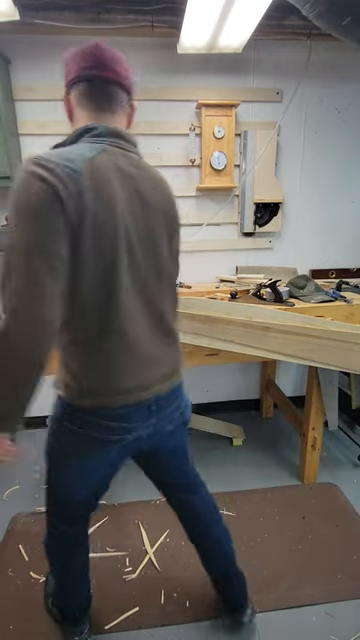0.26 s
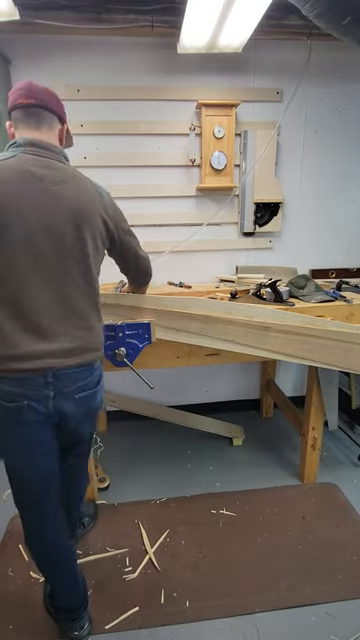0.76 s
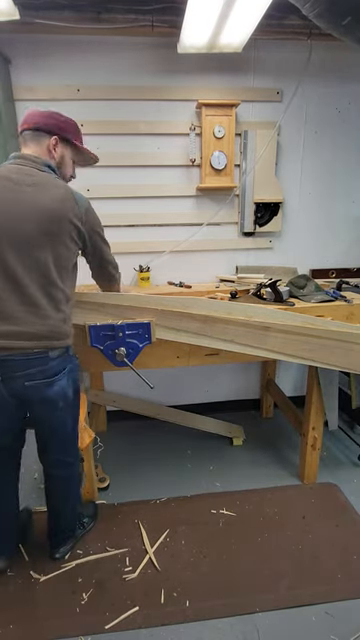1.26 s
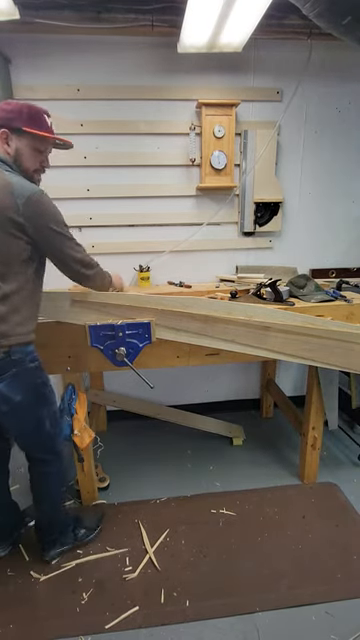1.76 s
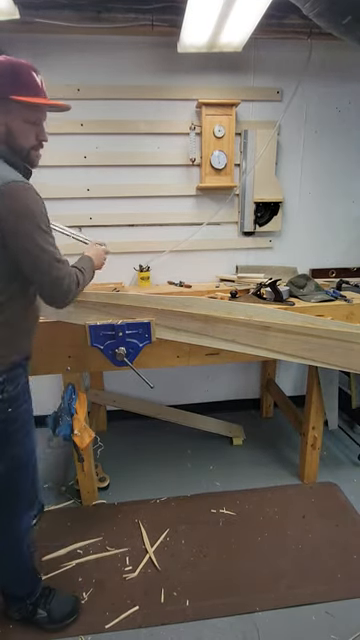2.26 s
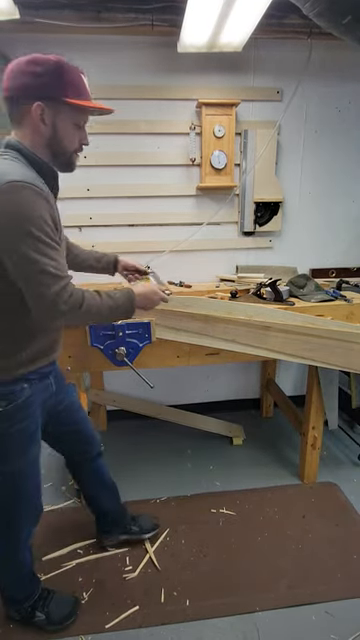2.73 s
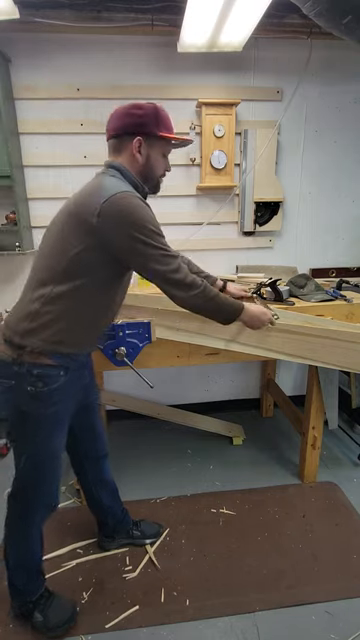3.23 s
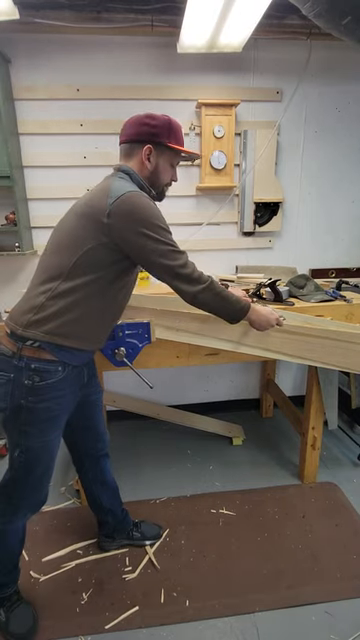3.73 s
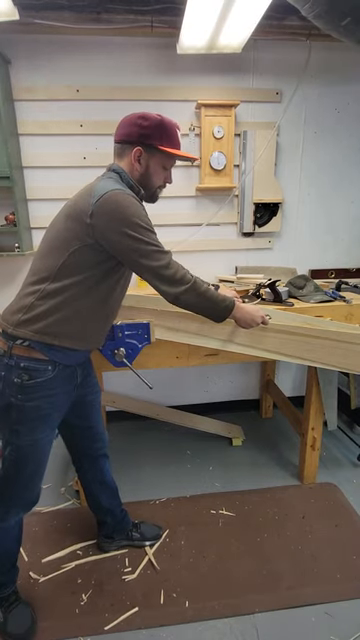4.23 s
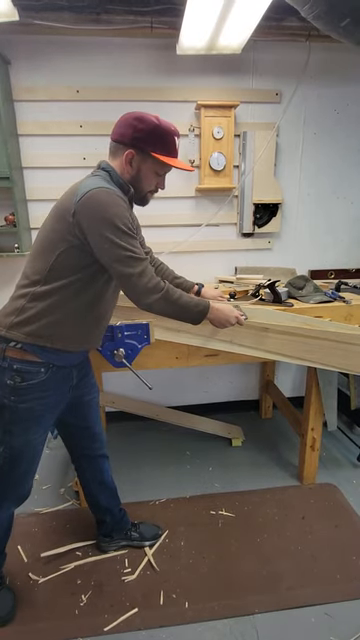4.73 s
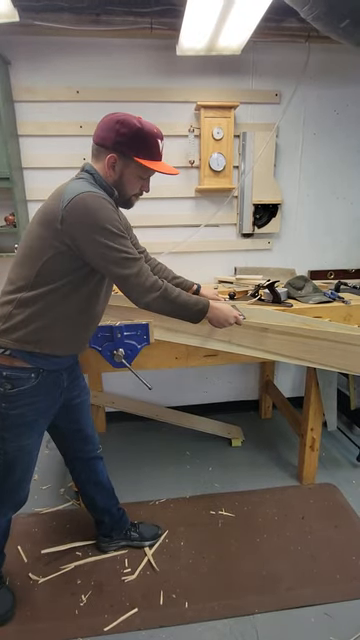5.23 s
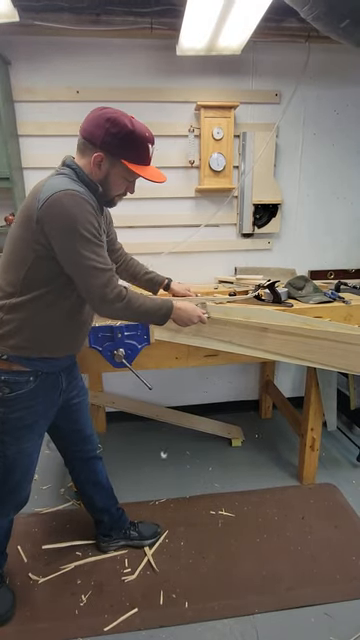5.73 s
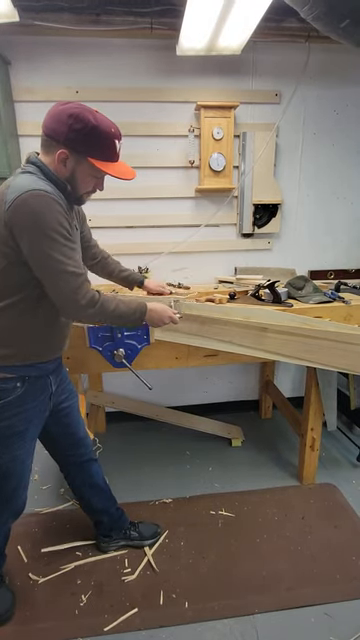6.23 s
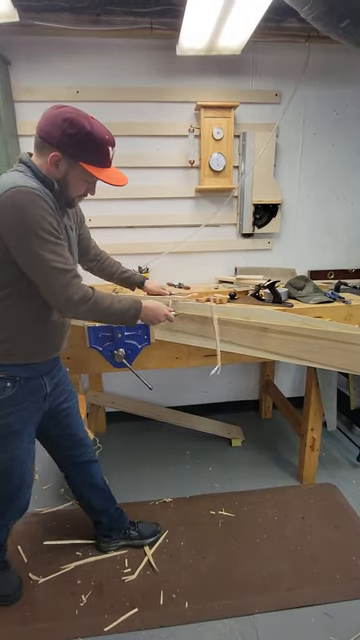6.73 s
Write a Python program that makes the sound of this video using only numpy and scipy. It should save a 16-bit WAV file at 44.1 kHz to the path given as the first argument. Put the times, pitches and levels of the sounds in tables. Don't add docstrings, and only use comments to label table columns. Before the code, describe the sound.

A fan hums while shoes shuffle and a tool clatters on a bench, then short rasping cuts tear wood fibres, growing louder and sharper.

```python
import sys
import numpy as np
from scipy import signal
from scipy.fft import rfft, irfft, next_fast_len
from scipy.io import wavfile
from scipy.ndimage import uniform_filter1d

SR = 44100
rng = np.random.default_rng(int(sys.argv[2]) if len(sys.argv) > 2 else 0)


def master_out(mix):
    frames = np.transpose(np.atleast_2d(mix))
    ceiling = np.clip(frames, -1, 1)
    pcm = np.round(ceiling * 32767).astype(np.int16)
    wavfile.write(sys.argv[1], SR, pcm)


def field_ratio(decibels):
    return 10 ** (np.asarray(decibels, dtype=float) / 20)


N = 307818
SIZE = next_fast_len(N + 32768)
HZ = np.fft.rfftfreq(SIZE, 1 / SR) + 1e-3

# (full bite t/s, level/dB, rise/s, hold/s, keenness/dB)
CUTS = [(3.768, -44.5, 0.11, 0.057, -1), (3.862, -39, 0.2, .06, 4), (3.914, -36.5, 0.03, 0.05, 4.5),
        (3.979, -35, 0.026, 0.018, 7), (4.28, -32, 0.032, 0.024, 6), (4.345, -41, .1, 0.0064, 10),
        (4.64, -32.5, 0.06, 0.012, 8), (4.665, -30.5, 0.066, 0.061, 4), (4.75, -28, 0.087, 0.021, 5),
        (4.772, -22.5, 0.038, 0.011, 1), (4.81, -24.5, 0.18, 0.0049, 1), (5.328, -20, 0.013, 0.051, 0),
        (5.39, -24, 0.13, 0.008, 0), (5.744, -22, 0.053, 0.078, 1), (5.826, -19, 0.051, 0.017, 2.5),
        (5.87, -24, 0.079, 0.032, 4), (6.228, -22.5, 0.028, .02, 6.5), (6.243, -18, 0.053, 0.0093, 3),
        (6.272, -18, 0.046, 0.015, 3), (6.36, -21.5, 0.2, 0.0083, 1), (6.66, -39.5, 0.025, .002, 14.5),
        (6.836, -27, 0.035, .02, 2.5), (6.886, -22, 0.14, 0.051, 1)]
# (t/s, level/dB, rise/s, hold/s, keenness/dB)
GLIDES = [(3.4, -59.5, 0.027, 0.068, 4), (3.454, -46, 0.034, 0.0089, -16), (3.5, -51.5, .03, 0.047, 1),
          (3.6, -52, 0.43, 0.0017, 8), (4.134, -53, 0.03, 0.0069, 5), (4.2, -64, .05, 0.026, 17),
          (4.454, -47.5, 0.026, 0.0047, 5.5), (4.568, -45, 0.028, 0.044, 8), (4.606, -39.5, .02, .02, 6.5),
          (4.95, -49.5, 0.11, 0.075, -3), (5.07, -55.5, 0.097, 0.014, 6.5), (5.15, -50.5, 0.035, .03, -1),
          (5.19, -45, 0.085, 0.012, 1), (5.234, -41, 0.12, 0.0044, -4), (5.3, -41.5, 0.089, .02, 2),
          (5.612, -42.5, 0.015, 0.031, -0.5), (5.654, -42.5, 0.09, 0.0074, -6),
          (6.03, -45, 0.21, 0.012, 1.5), (6.19, -35.5, 0.05, .02, 2.5), (6.462, -40.5, 0.12, 0.0035, 4.5),
          (6.6, -49, 0.54, 0.017, 3.5), (6.714, -41, 0.03, 0.0086, -3), (6.8, -43, .2, 0.022, 4)]
# (t/s, level/dB, rise/s, hold/s, f/Hz)
CHATTER = [(3.49, -48.5, 0.025, 0.057, 214.7), (3.9, -46, 0.0463, 0.13, 202.2),
           (4.3, -58.5, 0.032, 0.045, 203.6), (4.7, -51, 0.0917, 0.045, 205),
           (4.78, -41.5, 0.061, 0.04, 205), (5.234, -41, 0.035, 0.033, 204.8),
           (5.34, -36, 0.025, 0.099, 204.1), (5.52, -45.5, 0.063, 0.079, 188.7),
           (5.61, -42.5, 0.025, 0.029, 199), (5.72, -38, 0.052, 0.028, 195.6),
           (5.83, -33.5, 0.11, 0.066, 204), (6.04, -47.5, 0.15, 0.03, 200.1),
           (6.24, -39.5, 0.08, 0.058, 199), (6.32, -33.5, 0.064, 0.069, 200), (6.42, -43, 0.051, .03, 199),
           (6.5, -55, .05, 0.29, 195.3), (6.83, -42, 0.11, 0.13, 201)]
# (f/Hz, level/dB per Hz)
TEAR = [(40, -11.5), (150, 2), (310, -8), (500, -7.5), (780, -3.5), (1000, -8), (1700, -4.5), (4900, -7),
        (6500, -9), (9000, -15), (13000, -10), (16500, -17.5)]
# (f/Hz, width/Hz, level/dB)
BOARD = [(221, 34, 6), (300, 72, -1.5), (390, 11.5, 7), (513.2, 19, 8.5), (574, 13, 0.5), (700, 70, 3.5),
         (800, 80, -3), (1140, 240, 4), (1490, 170, 0)]
# (f/Hz, width/Hz, level/dB)
BLADE = [(2475, 24, 3.5), (4650, 330, -2), (5900, 440, -0.5), (7300, 190, 2)]
BAND_HZ = (190, 600, 3500, 12000)
# (f/Hz, level/dB per Hz)
RUMBLE = [(20, -42), (42, -32), (60, 12), (100, -4), (160, -24)]
# (t/s, peak level/dB, fine hiss level/dB)
SNAPS = [(2.3524, -48.5, 4.5), (3.913, -31, 15), (3.977, -22.5, 1), (4.267, -44, 5), (4.283, -24, 13),
         (4.3388, -23, 6), (4.7319, -16, -2), (4.7699, -11.5, 4.5), (4.812, -13, 3), (5.3255, -21, 2),
         (5.607, -45.5, 11), (5.719, -30, 13), (5.7308, -25.5, 13), (5.8252, -13, 2), (5.904, -34, 3),
         (6.225, -27, 3), (6.6566, -18.5, 2), (6.662, -21, 1), (6.696, -31, -10.5), (6.8225, -30, 12),
         (6.8537, -17.5, 8), (6.8823, -11.5, 9)]
# (t/s, peak level/dB, board level/dB)
TAPS = [(0.211, -43.5, -4), (0.7214, -40, -1), (0.7622, -38, 1), (0.7867, -33, 3.5), (.8, -45, 6),
        (1.031, -42, -30), (2.1791, -47, -2), (2.8697, -45, 4), (2.9237, -41, 0), (3.444, -38, 6),
        (3.4545, -39.5, 10), (4.136, -38.5, -3), (4.4494, -36, 2), (4.459, -30, -2), (5.648, -32, 0),
        (6.1265, -44, 0.5), (6.592, -37, -3), (6.703, -17, -23)]
# (t/s, peak level/dB, f/Hz, t60/s)
TICKS = [(0.7202, -39.5, 3800, 0.016), (0.7607, -44, 4200, .015), (0.7869, -29.5, 1000, 0.063),
         (0.7996, -34, 1150, .05), (2.871, -49.5, 4100, 0.036), (2.957, -52, 3600, .03),
         (2.959, -53, 7140, .03), (4.339, -28, 14800, .02), (4.0723, -39, 13000, .012),
         (5.327, -21.5, 1500, .05), (5.8255, -18, 6100, 0.014), (5.8321, -25, 5000, .012),
         (5.79, -22, 2980, .012), (6.124, -52, 2590, 0.026), (6.2531, -14, 1675, 0.057),
         (6.6563, -30, 14500, .012), (6.66, -21.5, 4560, .014), (6.6985, -31, 14000, .012),
         (6.8227, -16.5, 12800, 0.012), (6.8355, -20, 12000, .012), (6.856, -27, 12000, .014),
         (6.907, -18, 5500, 0.011)]
# (frequency ratio, level/dB)
TICK_PARTIALS = [(.8, -9.5), (.91, -3.5), (1, 3.5), (1.12, 1)]
# (t/s, peak level/dB, f/Hz)
RAPS = [(0.721, -28.5, 568), (.764, -31, 608), (0.7875, -31, 718), (.8, -35, 764), (2.87, -40, 400),
        (2.925, -39, 800), (3.442, -54, 481), (3.455, -44, 900), (3.466, -25, 407), (3.912, -27, 1184),
        (4.133, -36, 503), (4.282, -23.5, 701), (4.299, -24.5, 650), (4.456, -40, 526), (4.467, -33, 483),
        (4.512, -32.5, 542), (4.98, -30, 503), (5.129, -47, 380), (5.225, -27, 547), (5.326, -15.5, 870),
        (5.645, -40, 700), (5.649, -26, 1610), (5.79, -15.5, 516.3), (5.822, -20, 542),
        (6.714, -21.5, 1905), (6.125, -51, 485), (6.191, -16.5, 1073), (6.702, -26, 1210),
        (6.806, -21, 725)]
# (frequency ratio, level/dB)
RAP_PARTIALS = [(1.001, -0.5), (1.62, -4), (2.35, -15)]
# (t/s, peak level/dB, f/Hz, swell/s)
JOLTS = [(1.471, -25, 133, 0.019), (3.479, -34.5, 77.5, 0.032), (3.927, -61, 178.8, 0.017),
         (4.295, -40, 147, 0.013), (4.536, -37, 122, 0.012), (4.772, -50, 147, 0.047),
         (5.221, -43, 165, 0.025), (5.326, -27, 175, 0.018), (5.449, -43, 83.5, 0.06),
         (5.593, -28, 116.5, 0.0081), (5.704, -25.5, 125, 0.011), (5.842, -48, 131, 0.029),
         (5.9, -37, 89.6, 0.024), (6.136, -36.5, 124.2, 0.014), (6.248, -44, 168, 0.024),
         (6.332, -52, 171.3, 0.027), (6.416, -37.5, 129.8, 0.023), (6.57, -36, 113, 0.0098),
         (6.824, -61, 152, 0.034), (6.9, -34, 139, 0.026)]
# (t/s, level/dB)
KNOCK = (1.469, -4.5)
# (t after landing/s, level/dB)
BOUNCES = [
    (0, -7),
    (.0043, -2.5),
    (.0086, 0.5),
    (0.0226, -5.5),
    (.037, -7),
]
# (f/Hz, level/dB, t60/s)
BENCH = [(131, -12, 0.21), (184, -9, 0.25), (205, -4, .3), (232.2, -0.5, 0.4), (353, 2, 0.4),
         (391, -6, .35), (433.3, 0, 0.39), (485, -4, 0.35), (568, -10, 0.49), (640, -3, 0.22),
         (700, 4.5, 0.22), (767, -2.5, 0.44), (1077, -10, 0.36), (1300, -6, 0.25)]
# (f/Hz, level/dB per Hz)
KNOCK_CRACK = [(40, -32), (120, -11), (200, -14.5), (300, -9), (420, -4), (700, -7), (1000, -13),
               (1700, -23), (2500, -25), (6000, -39), (9000, -52), (16000, -59)]
# (t/s, level/dB, rise/s, hold/s, keenness/dB)
SCUFFS = [(.222, -49.5, 0.022, 0.021, -1), (.28, -58.5, 0.037, 0.0076, 12.5), (.33, -62.5, .05, 0.11, -1),
          (.72, -48.5, 0.0037, 0.03, 6.5), (.755, -46, 0.067, 0.022, 2), (.79, -56, .005, 0.02, -5),
          (1.032, -58, .01, 0.011, 1), (1.432, -44.5, 0.01, 0.033, -1), (1.52, -56.5, .03, 0.15, -2),
          (1.792, -46.5, 0.14, 0.0021, 0.5), (2.178, -63, .03, .005, 3), (2.356, -57.5, 0.024, .002, -0.5),
          (2.43, -68, .05, 0.045, -2), (2.87, -62.5, .02, 0.09, 1), (2.97, -62, 0.051, 0.25, 3)]
# (f/Hz, level/dB per Hz)
FAN = [(15, -56), (25, -25), (65, -5), (121, -11.5), (187, -7.5), (433, -13.5), (483, -6), (600, -21),
       (726, -15), (1010, -29), (1090, -23), (1430, -30.5), (9580, -33), (14000, -41), (16500, -62)]
# (f/Hz, level/dB)
HUM = [(479.5, -62), (387.5, -71), (735, -77)]
# f/Hz, level/dB, steady until t/s, then fade/dB per s
FADING_HUM = (511, -66, 2.6, 8)
# (f/Hz, t60/s)
ROOM_T60 = [(100, 1), (500, 0.48), (2000, 0.34), (6000, 0.39), (14000, 0.13)]
MOVE_S = {"edge": .017, "body": .12}
# (f/Hz, left minus right level/dB)
PORTS = [(60, 2.5), (110, 3.5), (200, -3.5), (380, -2), (700, -2), (1290, -1), (2380, 0.5), (4400, -2),
         (6600, -6), (8600, 9), (14000, 3.5)]
# (f/Hz, width/Hz, level/dB)
PORT_DIP = [(8600, 590, -6), (10220, 3300, -4.5)]

PLACES = 6
PORT_LAG = 14


def drawknife():
    grain = fibres(spread_db=1.66, flutter_db=3.5, crackle_db=12.0)
    thud, board, tear, hiss = bands(colour(grain, TEAR, BOARD + BLADE))
    cut, cut_keen = gestures(CUTS, sag_db_s=26, fall_db_s=257)
    glide, glide_keen = gestures(GLIDES, sag_db_s=0, fall_db_s=242)
    shake_db, bench_hz = gestures(CHATTER, sag_db_s=0, fall_db_s=337)
    db = np.maximum(cut, glide)
    keen = np.where(cut > glide, cut_keen, glide_keen)
    bite = np.clip(db + 25, -40, 10)

    hiss_db = 2 + 0.38 * bite + keen
    edge = field_ratio(db - 2.5) * (tear + field_ratio(hiss_db) * hiss)

    growth_db = 1.5 * (np.arange(N) / SR - 5.3)
    glide_board_db = 0
    gliding = uniform_filter1d(1. * (glide > cut), size=600)
    board_db = -5 + growth_db + glide_board_db * gliding - 0.26 * bite - 0.38 * keen
    patchy = field_ratio(1.5 * walk(25))
    body = field_ratio(db + board_db - 1.0) * patchy * board

    phase = 2 * np.pi * np.cumsum(bench_hz) / SR + 2.4 * walk(14)
    sing = np.sin(phase) * field_ratio(1.8 * walk(30))
    floor_db = 0.5 * uniform_filter1d(db, SR // 20) - 39
    rumble = unit(colour(rng.standard_normal(N), RUMBLE)) * field_ratio(floor_db)
    port_difference = 0.22 * np.roll(rumble, 9000) * [[1], [-1]]
    bench = field_ratio(shake_db) * (0.87 * sing + 0.53 * thud)
    bench = bench + field_ratio(-50 + 0.53 * bite) * thud + rumble + port_difference
    return edge, body, bench


def snaps(board_s=0.017, splinter=0.51):
    _, board, tear, hiss = bands(colour(rng.standard_normal(N), TEAR, BOARD + BLADE))
    click = colour(1. * (np.arange(N) == 5000), TEAR)
    _, _, tick, fine = (b[4900:5100] for b in bands(click))
    out, t = np.zeros(N), np.arange(4000) / SR
    # (t/s, level/dB, hiss/dB, board/dB, crack decay/s)
    rows = [(s, db, -23, board_db, 0.0023) for s, db, board_db in TAPS]
    rows += [(s, db, hiss_db, -26, 0.0021) for s, db, hiss_db in SNAPS]
    for s, db, hiss_db, board_db, crack_s in rows:
        i, gain = int(s * SR), field_ratio(db)
        cut = slice(i, i + len(t))
        crack = (tear[cut] + field_ratio(hiss_db) * hiss[cut]) * np.exp(-t / crack_s)
        board_ring = field_ratio(board_db) * board[cut] * np.exp(-t / board_s)
        out[cut] += gain * splinter * (crack + board_ring)
        out[i - 100:i + 100] += gain * (tick + field_ratio(hiss_db) * fine) / tick.max() * 1.3
    return out


def ticks():
    out, t = np.zeros(N), np.arange(2000) / SR
    for s, db, hz, t60 in TICKS:
        tone = sum(field_ratio(d) * np.sin(2 * np.pi * hz * ratio * t) for ratio, d in TICK_PARTIALS)
        i = int(s * SR)
        out[i:i + len(t)] += field_ratio(db - 5.5 - 60 * t / t60) * tone
    return out


def raps():
    t60, swell_s = 0.062, 0.0018
    out, t = np.zeros(N), np.arange(4000) / SR
    for s, db, hz in RAPS:
        tone = 0
        for ratio, partial_db in RAP_PARTIALS:
            level = field_ratio(partial_db + 2 * rng.standard_normal())
            tone = tone + level * np.sin(2 * np.pi * hz * ratio * t) * field_ratio(-60 * t * ratio / t60)
        tone = tone * (1 - np.exp(-t / swell_s))
        i = int(s * SR)
        out[i:i + len(t)] += field_ratio(db - 4) * tone
    return out


def jolts():
    out, t = np.zeros(N + SR), np.arange(SR // 2) / SR
    for s, db, hz, swell in JOLTS:
        push = t / swell * np.exp(1 - t / swell)
        i = int(s * SR)
        out[i:i + len(t)] += field_ratio(db - 5.5) * push * np.sin(2 * np.pi * hz * t)
    return out[:N]


def knock():
    start, level_db = KNOCK
    since = np.clip(np.arange(N) / SR - start, 0, None)
    land = 1 - np.exp(-since / 0.0018)
    blow = 0.056 * rng.standard_normal(N) * land * np.exp(-since / 0.011)
    for s, db in BOUNCES:
        blow[int((start + s) * SR)] += field_ratio(db)
    modes = 0
    for k, (hz, db, t60) in enumerate(BENCH):
        modes = modes + (-1) ** k * field_ratio(db) * ring(blow, hz, t60)
    crack = unit(colour(rng.standard_normal(N), KNOCK_CRACK)) * land * np.exp(-since / 0.017)
    return field_ratio(level_db) * 0.39 * modes / abs(modes).max(), field_ratio(level_db) * 0.66 * crack


def scuffs():
    _, body, rub, hiss = bands(colour(fibres(spread_db=2.5, flutter_db=4.0, crackle_db=-6), TEAR))
    db, keen = gestures(SCUFFS, sag_db_s=0, fall_db_s=238)
    return field_ratio(db - 2.5) * (rub + field_ratio(keen - 6) * hiss + field_ratio(-3.5 - 3.4 * keen) * body)


def air():
    t = np.arange(N) / SR
    hums = 0
    for hz, db in HUM:
        level = field_ratio(db + 2 + 1.5 * walk(6.4))
        hums = hums + level * np.sin(2 * np.pi * hz * t + 0.15 * walk(7.0))
    hz, db, until, fade = FADING_HUM
    level = field_ratio(db + 2 - fade * np.maximum(t - until, 0))
    hums = hums + level * np.sin(2 * np.pi * hz * t + 0.6 * np.sin(3.1 * t))
    fan = colour(rng.standard_normal((2, N)), FAN, [(9100, 3100, -16.0), (448, 19, -9)])
    return pair(unit(fan) * field_ratio(-58.5 + 0.7 * walk(3))) + hums


def echoes(size=32768):
    t, hz = np.arange(size) / SR, np.fft.rfftfreq(size, 1 / SR) + 1e-3
    noise = rfft(rng.standard_normal((2, size)))
    tail = 0
    for mid_hz in 60 * 2 ** np.arange(9):
        octave = np.clip(1 - abs(np.log2(hz / mid_hz)), 0, 1)
        tail = tail + irfft(noise * octave, size) * field_ratio(-60 * t / on_log(ROOM_T60, mid_hz))
    tail = tail * np.clip(t / 0.0098, 0, 1)
    early = rng.standard_normal((2, size)) * np.exp(-t / 0.009)
    tail = field_ratio(-6) * tail / np.sqrt((tail ** 2).sum())
    early = field_ratio(-1.5) * early / np.sqrt((early ** 2).sum())
    echo = pair(tail + early)
    echo[[0, 1], [PORT_LAG + rng.integers(-26, 9), 0]] += field_ratio(-4.5)
    return echo[:, :size - 2048]


def room(x, move_s, spots):
    place, out = np.arange(N) / SR / move_s, 0
    for k, echo in enumerate(spots):
        distance = abs((place - k + PLACES / 2) % PLACES - PLACES / 2)
        near = np.clip(1 - distance, 0, 1)
        out = out + rfft(x * np.sin(np.pi / 2 * near), SIZE) * echo
    return irfft(out, SIZE)[:, :N]


def pair(x):
    hz = np.fft.rfftfreq(x.shape[1], 1 / SR) + 1e-3
    share = 1 / (1 + (250 / hz) ** 4)
    mid, side = rfft(x)
    return irfft(np.array([mid + share * side, mid - share * side]), x.shape[1])


def fibres(spread_db, flutter_db, crackle_db):
    flutter = 0.82 * walk(60) + walk(400)
    size = field_ratio(spread_db * rng.exponential(size=N) + flutter_db * flutter)
    struck = rng.random(N) < 260 / SR
    splinters = struck * field_ratio(crackle_db + 2.5 * np.minimum(rng.exponential(size=N), 2))
    return size * rng.standard_normal(N) + splinters


def gestures(rows, sag_db_s, fall_db_s):
    t = np.arange(0, N, 32) / SR
    s, db, rise, hold, keen = np.array(rows).T[:, :, None]
    after = t - s
    level = db + 25 * np.minimum(after, 0) / rise
    level = level - sag_db_s * np.clip(after, 0, hold) - fall_db_s * np.maximum(after - hold, 0)
    keen = uniform_filter1d(keen[level.argmax(axis=0), 0], size=15)
    loudest = np.maximum(level.max(axis=0), -110)
    return [np.interp(np.arange(N) / SR, t, curve) for curve in (loudest, keen)]


def walk(rate):
    k = int(SR / rate)
    held = np.repeat(rng.standard_normal(N // k + 1), k)
    return 0.46 * uniform_filter1d(held, k)[:N]


def ring(x, hz, t60):
    pole = np.exp(2j * np.pi * hz / SR - np.log(1000) / (t60 * SR))
    return signal.lfilter([0, pole.imag], [1, -2 * pole.real, abs(pole) ** 2], x + 1e-18)


def bands(x):
    place = np.interp(np.log(HZ), np.log(BAND_HZ), np.arange(4))
    spectrum = rfft(x, SIZE)
    out = []
    for k in range(4):
        window = np.sin(np.pi / 2 * np.clip(1 - abs(place - k), 0, 1)) ** 2
        out.append(unit(irfft(spectrum * window, SIZE)[:N]))
    return out


def colour(x, table, peaks=()):
    humps = sum(d / (1 + ((HZ - f) / (w / 2)) ** 2) for f, w, d in peaks)
    return irfft(rfft(x, SIZE) * field_ratio(on_log(table, HZ) + humps), SIZE)[..., :N]


def on_log(table, hz):
    f, v = np.transpose(table)
    return np.interp(np.log(hz), np.log(f), v)


def unit(x):
    return x / np.sqrt(np.mean(x ** 2))


def scene():
    edge, board, bench = drawknife()
    snap, tick, rap = snaps(), ticks(), raps()
    top, crack = knock()
    spots = [rfft(echoes(), SIZE) for _ in range(PLACES)]
    quick = edge + scuffs() + 0.78 * snap + crack + field_ratio(-4) * tick
    slow = board + 0.85 * rap + 0.47 * top
    echoing = room(quick, MOVE_S["edge"], spots) + room(slow, MOVE_S["body"], spots)
    near = tick + 0.7 * top + field_ratio(-8) * (snap + rap)
    direct = np.array([np.roll(near, PORT_LAG), near])
    return echoing + direct + bench + jolts() + air()


def low_pass(x):
    return signal.sosfilt(signal.butter(12, 16830, fs=SR, output="sos"), x)


def record(dry):
    tilt = on_log(PORTS, HZ) / 2
    ports = irfft(rfft(dry, SIZE) * field_ratio([tilt, -tilt]), SIZE)[:, :N]
    ports = np.tanh(1.15 * ports) / 1.15
    ports = colour(ports, [(25, -10), (50, 0), (15850, 0), (16000, -44)], PORT_DIP)
    return low_pass(ports)


dry = scene()
out = record(dry)
master_out(out)
```